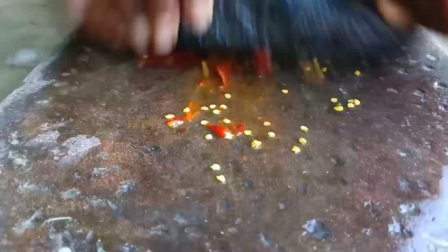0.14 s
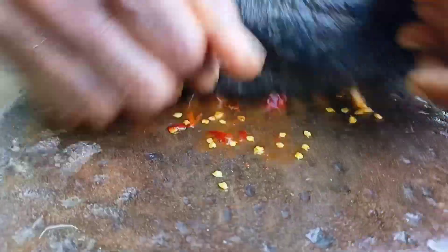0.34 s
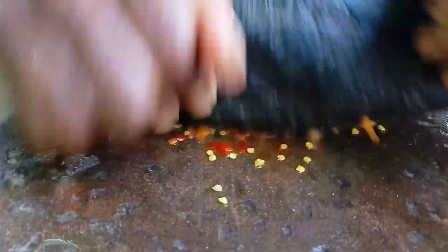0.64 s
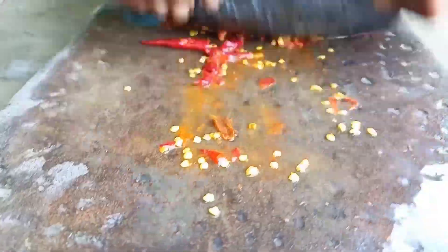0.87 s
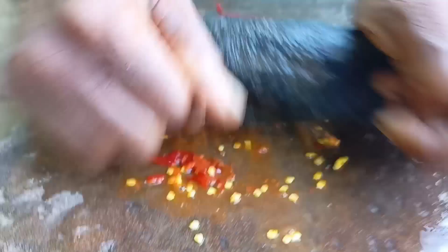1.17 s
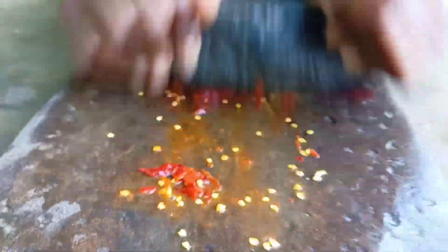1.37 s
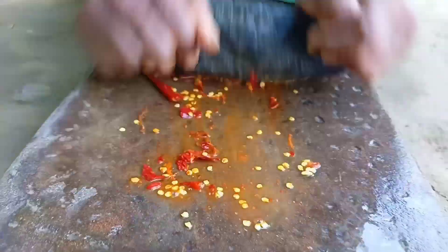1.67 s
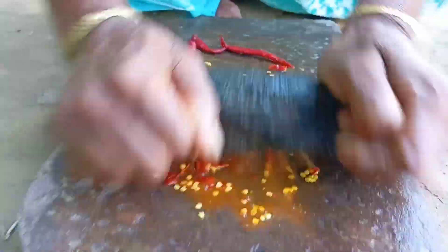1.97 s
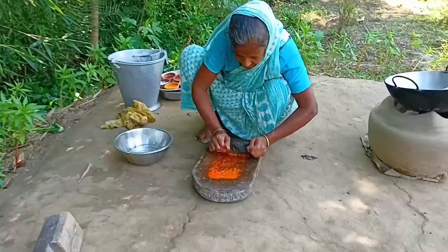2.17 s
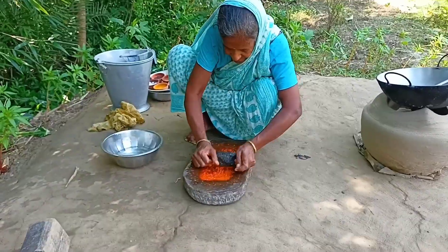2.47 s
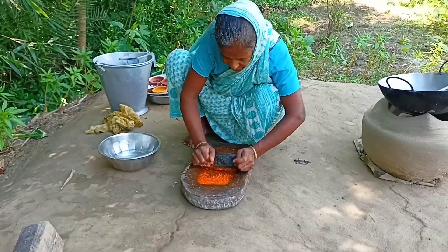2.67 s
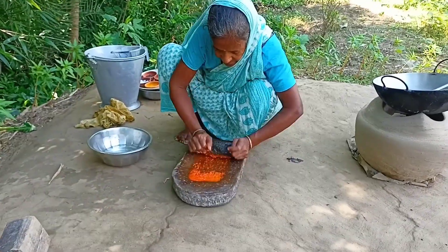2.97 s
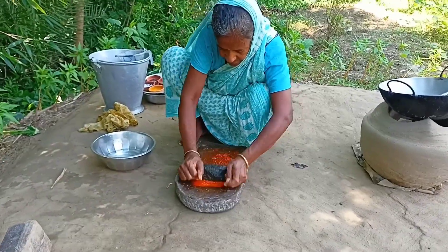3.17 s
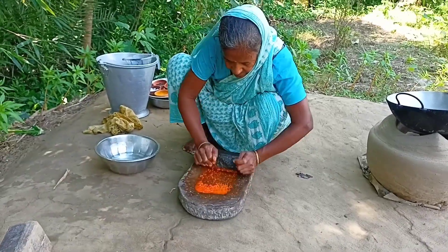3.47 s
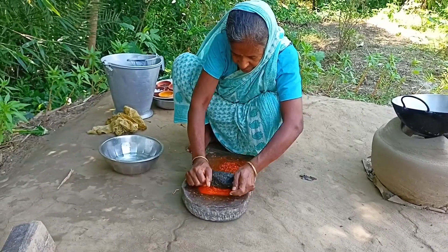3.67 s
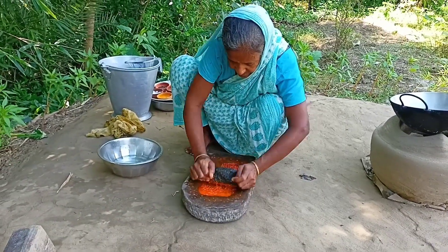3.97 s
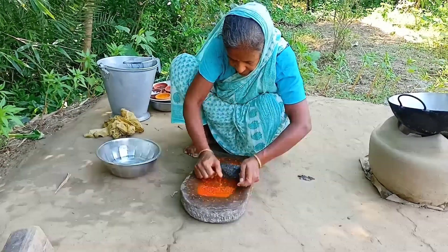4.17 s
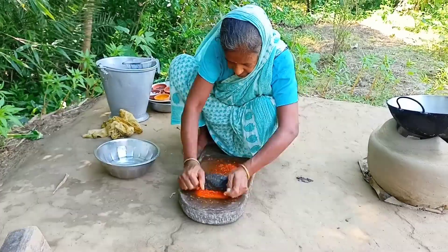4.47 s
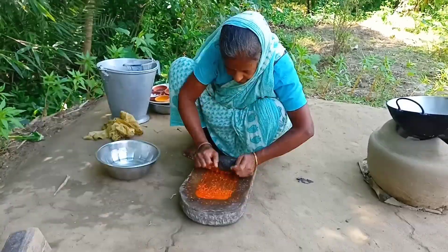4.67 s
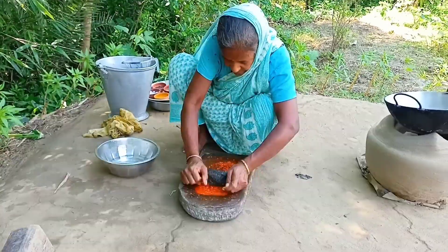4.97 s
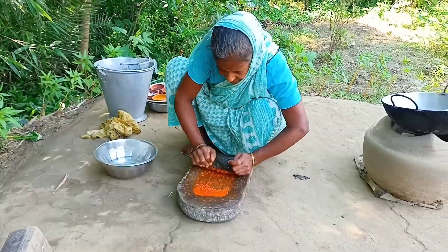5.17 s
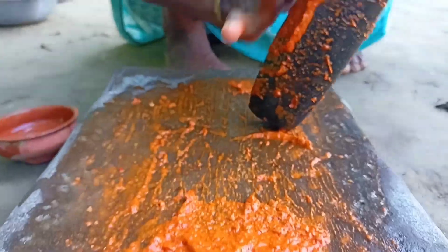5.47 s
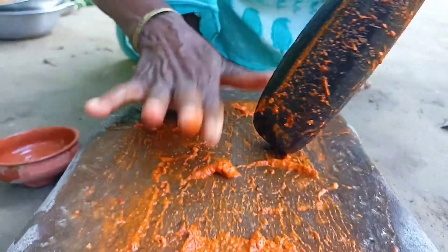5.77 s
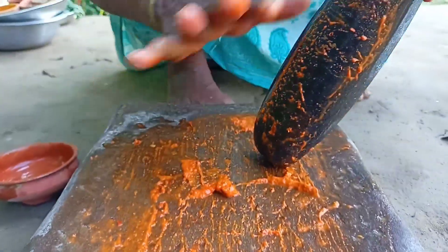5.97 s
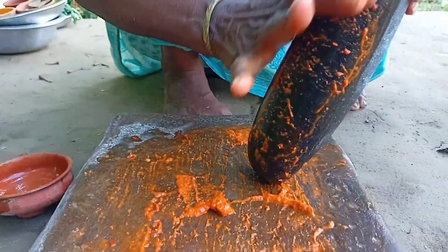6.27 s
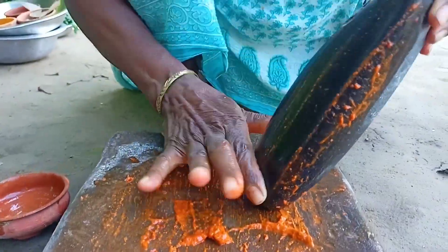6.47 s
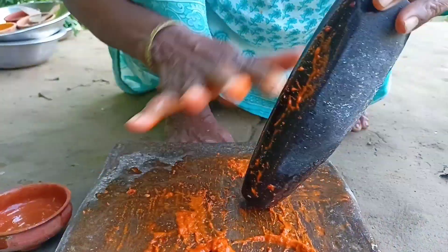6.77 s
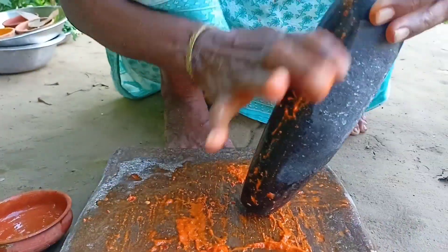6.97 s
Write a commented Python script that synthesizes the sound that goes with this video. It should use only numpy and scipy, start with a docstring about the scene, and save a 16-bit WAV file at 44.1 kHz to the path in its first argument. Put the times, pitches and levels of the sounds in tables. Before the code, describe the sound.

Dry chillies crunch and snap under a stone roller pushed to and fro near the microphone, the slab rumbling and the stones knocking with a short ring. The grinding turns quieter and more distant, a steady rhythm of sticky crackles and small pops in wet paste. It ends with a slight squeal, followed by soft finger smears and two wet clicks. Faint insects and outdoor air continue, and a far bird whistles at the end.

```python
"""Grit crunches and a slab rumbles as a stone roller is pushed to and fro over dry chillies, close by
and outdoors. The roller thumps, knocks and rings in its modes; husks fracture with snaps and squeaks.
Further off it works wet paste, which crackles and pops as its film tears, and stick-slip gives a squeal.
Last, fingers wipe the paste together with two wet clicks and a far bird whistles.
Soft garden air and insects lie beneath it all."""
import sys
import numpy as np
from scipy import signal
from scipy.fft import rfft, irfft, next_fast_len
from scipy.io import wavfile
from scipy.ndimage import uniform_filter1d, map_coordinates

SR = 44100
rng = np.random.default_rng(int(sys.argv[2]) if len(sys.argv) > 2 else 0)


def waveform_to_disk(signal):
    """Save audio, clipped to [-1, 1], as 16-bit WAV at the path in sys.argv[1]."""
    frames = np.transpose(np.atleast_2d(signal))
    scaled = np.clip(frames, -1, 1) * 32767
    samples = np.round(scaled).astype(np.int16)
    wavfile.write(sys.argv[1], SR, samples)


N = 313977
TIME = np.arange(N) / SR
FFT_SIZE = 2 * next_fast_len(N // 2 + 1)
FFT_HZ = np.fft.rfftfreq(FFT_SIZE, 1 / SR)
TOP_HZ = 15550

# spectrum of grit on stone: frequency_hz, gain_db
GRIT_SPECTRUM = [(150, -21), (420, -20), (620, -17.5), (830, -21.5), (1150, -17), (1650, -13),
                 (2700, -10.5), (3700, -12), (4900, -13), (7400, -11.5), (10100, -24), (12400, -28),
                 (15000, -19.5)]
# spectrum of a snap or pop: frequency_hz, gain_db
SNAP_SPECTRUM = [(200, -23.5), (1100, -29), (2350, -18.5), (3100, -7.5), (7400, 8), (10400, -7),
                 (12800, 8.5), (13800, -2.5), (15500, 2)]
# normal modes of the roller lying on the slab: pitch_hz, t60_s, level_db
ROLLER_MODES = [(559, 0.015, 0), (710, 0.021, -8.5), (970, 0.031, -12.5), (1309.6, 0.059, -3.5),
                (1455, 0.059, -11), (1769, 0.021, -6.5), (1900, 0.016, -2.5), (2470, 0.018, -5),
                (3210, 0.07, -12)]


def undb(db):
    """Decibels to amplitude ratio."""
    return 10 ** (np.asarray(db) / 20)


def unit(x):
    """Normalise to rms 1."""
    return x / np.sqrt(np.mean(x ** 2))


def colour(x, spectrum, tilt_db=0):
    """Minimum-phase filter through (Hz, dB) points, tilted by tilt_db per octave above 3 kHz."""
    size = 2 * next_fast_len(len(x) // 2 + 1024)
    octave = np.log2(np.maximum(np.fft.rfftfreq(size, 1 / SR), 1))
    hz, db = np.transpose(spectrum)
    gain_db = np.interp(octave, np.log2(hz), db) + tilt_db * np.maximum(octave - np.log2(3000), 0)
    cepstrum = irfft(np.log(undb(gain_db)))
    cepstrum[1:size // 2] *= 2  # folding the cepstrum makes the filter causal
    cepstrum[size // 2 + 1:] = 0
    return irfft(rfft(x, size) * np.exp(rfft(cepstrum)))[:len(x)]


def wander(rate_hz):
    """Random modulation: ramps between levels drawn rate_hz times a second; rms 1."""
    hold = max(int(SR / rate_hz), 101)
    levels = rng.standard_normal(N // 100)[:N // hold + 1]
    return unit(uniform_filter1d(np.repeat(levels, hold), hold)[:N])


def grains(per_s, spread_db):
    """Shot noise: tiny fractures at random moments, most small and a few large; rms 1."""
    size_db = spread_db * np.minimum(rng.exponential(size=N), 6)
    return unit((rng.random(N) < per_s / SR) * rng.choice([-1, 1], N) * undb(size_db))


def narrow_noise(hz, width_hz):
    """Narrow-band noise, which wavers in amplitude and phase; rms 1."""
    band = 1 / (1 + ((FFT_HZ - hz) / width_hz) ** 2)
    return unit(irfft(rfft(rng.standard_normal(FFT_SIZE)) * band)[:N])


def swell(start, end):
    """Half-sine envelope between two moments."""
    return np.sin(np.pi * np.clip((TIME - start) / (end - start), 0, 1))


def glide(start, end, start_hz, end_hz, db):
    """Linear frequency sweep that swells and fades."""
    phase = 2 * np.pi * np.cumsum(np.interp(TIME, [start, end], [start_hz, end_hz])) / SR
    return undb(db) * swell(start, end) * np.sin(phase)


def add(track, start_s, sound):
    """Superpose a short sound on the track."""
    i = int(start_s * SR)
    track[i:i + len(sound)] += sound[:N - i]


def stroke_gains(strokes, grit_power, rumble_power, contact_s, bare_rumble_db):
    """Rolling noise grows as a power of speed; on bare stone the roller rings and the rumble swells."""
    grit, rumble, ring = np.zeros((3, N))
    for start, fastest, end, grit_db, rumble_db, bare_s, ring_db in strokes:
        span = slice(max(int(start * SR), 0), int(end * SR))
        t = TIME[span]
        speed = np.sin(np.pi / 2 * np.interp(t, [start, fastest, end], [0, 1, 0]))
        contact = 1 / (1 + ((t - bare_s) / contact_s) ** 2)
        grit[span] += undb(grit_db) * speed ** grit_power
        rumble[span] += undb(rumble_db + bare_rumble_db * contact) * speed ** rumble_power
        ring[span] += undb(ring_db) * speed * contact
    return grit, rumble, ring


def crumble(per_s, surge_db, decay_s):
    """Exponential relaxation: as each seed gives way the crunch jumps and dies back. A gain of rms 1."""
    breaks = (rng.random(N) < per_s / SR) * rng.uniform(.5, 1, N)
    surges = signal.lfilter([1], [1, -np.exp(-1 / (decay_s * SR))], breaks)
    return unit(1 + undb(surge_db) * surges)


def slab_reflection(x, lag_s, echo_db):
    """Comb filtering: the slab's echo meets the direct sound, its lag shifting as the roller travels."""
    lag = lag_s * (1 + .12 * wander(6))
    return x + undb(echo_db) * map_coordinates(x, [(TIME - lag) * SR], order=3)


def fragment_flicker(x, depth_db, rate_hz, bands=28):
    """Each fragment has its own resonance, so neighbouring bands flare up independently."""
    place = np.interp(np.sqrt(FFT_HZ), np.sqrt([500, TOP_HZ]), [0, bands - 1])
    spectrum = rfft(x, FFT_SIZE)
    out = np.zeros(N)
    for k in range(bands):
        band = irfft(spectrum * np.maximum(1 - np.abs(place - k), 0))[:N]
        out += band * undb(depth_db * wander(rate_hz))
    return out


def stone_ring(modes, favoured_hz, octaves):
    """Impulse response of damped modes, weighted by the place and hardness of the contact; peak 1."""
    t = TIME[:SR // 8]
    ring = np.zeros(len(t))
    for hz, t60, db in modes:
        weight = undb(db) / (1 + (np.log2(hz / favoured_hz) / octaves) ** 2)
        ring += weight * np.sin(2 * np.pi * hz * t) * np.exp(-np.log(1000) * t / t60)
    return ring / np.abs(ring).max()


def rubbed(ring):
    """Forced vibration: countless tiny slips keep a resonance sounding; rms 1."""
    slips = np.diff(grains(per_s=4000, spread_db=1), prepend=0)
    return unit(signal.fftconvolve(slips, ring)[:N])


def roller_tone():
    """Selective excitation: sliding contact sounds mainly one mode of the roller; rms 1."""
    return rubbed(stone_ring(ROLLER_MODES, 1200, octaves=0.022))


def dry_grinding():
    """Brittle fracture: grit is crushed under the roller, which judders over the pitted slab and rings."""
    # pushes and pulls: start_s, fastest_s, end_s, grit_db, rumble_db, bare_stone_s, ring_db
    strokes = [(-0.01, 0.117, 0.21, -37.5, -40.5, 0.13, -42.5),
               (0.202, 0.307, 0.41, -31.5, -46, 0.299, -44.5),
               (0.436, 0.542, 0.68, -36.5, -49.5, 0.536, -43),
               (0.641, 0.698, 0.82, -30, -46.5, 0.773, -38.5), (0.9, 0.955, 1.02, -37.5, -39, 0.941, -29.5),
               (1.02, 1.05, 1.095, -39, -47, 1.052, -46), (1.06, 1.135, 1.253, -28.5, -41, 1.125, -42),
               (1.24, 1.383, 1.49, -34, -40, 1.37, -38.5),
               (1.452, 1.546, 1.671, -28.0, -42.5, 1.559, -37.5),
               (1.68, 1.795, 1.914, -35, -41, 1.777, -36.5), (1.88, 1.944, 2.1, -29.5, -42.5, 1.971, -36.5),
               (2.08, 2.215, 2.324, -36, -45, 2.207, -44.5), (2.285, 2.35, 2.416, -36.5, -47.5, 2.345, -49)]
    # the slab's rumble: frequency_hz, gain_db
    slab_spectrum = [(25, -43), (42, -23), (87, -3.5), (185, 1), (235, -2), (320, -14), (520, -23),
                     (1200, -63.5)]
    # bright overtones of the stones, rung by the fractures: pitch_hz, t60_s, level_db
    bright_modes = [(2700, 0.0094, -2), (3680, 0.017, -3), (4432, .025, -3), (4830, 0.031, 1.5),
                    (5460, .025, -2.5), (6300, 0.01, -2.5), (7170, 0.027, 1.5)]
    grit, rumble, ring = stroke_gains(strokes, grit_power=2.5, rumble_power=1.4,
                                      contact_s=0.022, bare_rumble_db=2.5)
    judder = undb(0.96 * wander(160) + 0.57 * wander(40))
    seeds = crumble(per_s=100, surge_db=-7.5, decay_s=.003)
    fractures = slab_reflection(grains(per_s=15000, spread_db=2.5), lag_s=.0009, echo_db=-9)
    crunch = colour(fractures * judder * seeds, GRIT_SPECTRUM)
    crunch = unit(fragment_flicker(crunch, depth_db=4.5, rate_hz=70))
    bumps = unit(colour(grains(per_s=1500, spread_db=5) * judder, slab_spectrum))
    body = undb(-8.5) * rubbed(stone_ring(ROLLER_MODES, 680, octaves=0.36))
    overtones = undb(-10) * rubbed(stone_ring(bright_modes, 4800, octaves=2.2)) * judder
    tone = undb(-1.2) * roller_tone()
    return grit * (crunch + overtones) + undb(-0.36) * rumble * bumps + ring * (tone + body)


def cricket():
    """Stridulation: evenly spaced chirps, each a few beats of the wings; rms 1."""
    chirps_per_s, chirp_peak_s, wingbeats_per_s = 9.08, 5.71, 37
    chirps = np.cos(2 * np.pi * chirps_per_s * (TIME - chirp_peak_s))
    beats = np.cos(2 * np.pi * wingbeats_per_s * TIME)
    return unit(narrow_noise(8685, width_hz=60) * undb(6 * np.tanh(2 * chirps + 1) + 3 * beats))


def garden():
    """Ambient noise: soft outdoor air, and a cricket that follows its level up to a ceiling."""
    # loudness of the air: time_s, level_db
    air_levels = [(0, -51.5), (2.3, -53.5), (2.5, -72), (5.45, -68), (5.51, -81.5), (5.59, -75.5),
                  (5.62, -67.5), (7.12, -62.5)]
    # colour of the air: frequency_hz, gain_db
    air_spectrum = [(25, -23), (70, -1.5), (185, -1), (300, -7), (550, -10.5), (1000, -20), (3500, -17.5),
                    (5000, -18.5), (7000, -17.5), (8300, -15.5), (10000, -29), (15000, -22)]
    air_db = np.interp(TIME, *np.transpose(air_levels))
    air = unit(colour(rng.standard_normal(N), air_spectrum))
    cricket_db = np.minimum(air_db, -73) + 1.5
    return undb(air_db) * air + undb(cricket_db) * cricket()


def thumps():
    """Damped oscillation: under the roller's weight the slab bounces once or twice on the earth."""
    # bounces of the slab: start_s, level_db, pitch_hz
    bounces = [(0.088, -24.5, 136), (0.303, -32, 162), (0.733, -25.5, 143), (0.755, -26.5, 118),
               (0.954, -31, 229), (1.037, -26, 103), (1.13, -28.5, 177), (1.175, -28.5, 179),
               (1.303, -32, 198), (1.339, -28, 177), (1.455, -25.5, 143), (1.544, -36.5, 178),
               (1.758, -26, 173), (1.862, -29, 110), (1.985, -24.5, 152.8), (5.956, -53.5, 105.4),
               (6.772, -52, 131)]
    out = np.zeros(N)
    t = TIME[:SR // 8]
    rise_s = .005
    envelope = t / rise_s * np.exp(1 - t / rise_s)
    for start, db, hz in bounces:
        add(out, start, undb(db - 1.5) * np.sin(2 * np.pi * hz * t) * envelope)
    return out


def knocks():
    """Impact excitation: the roller tips onto the slab; crushed husk draws the contact into a rattle."""
    # knocks and light taps: start_s, level_db, favoured_hz
    impacts = [(0.1615, -18, 543), (0.169, -25.5, 1010), (.499, -28.5, 815), (0.795, -34.5, 735),
               (0.9128, -29, 590), (0.925, -23.5, 540), (1.1019, -3, 1990), (1.12, -29, 1410),
               (1.9127, -2.5, 1720), (2.649, -25, 1246), (3.286, -37.5, 1090), (3.4821, -35, 1054),
               (3.887, -44, 990), (4.313, -40.5, 940), (4.366, -41.5, 745), (4.944, -52, 790),
               (5.612, -51, 308), (5.87, -59.5, 481), (6.266, -58.5, 700)]
    out = np.zeros(N)
    t = TIME[:SR // 8]
    slab_note = undb(-26) * stone_ring(ROLLER_MODES, 717, octaves=0.021)  # wherever the roller lands
    attack = 1 - np.exp(-t / 0.0014)
    for start, db, hz in impacts:
        ring = (stone_ring(ROLLER_MODES, hz, octaves=0.32) + slab_note) * attack
        crush = rng.standard_normal(len(t)) * np.exp(-t / 0.0051)
        rattle = signal.fftconvolve(crush, ring * np.exp(-t / 0.006))[:len(t)]
        rattle_db = min(db, -24) - 4  # a husk bears only so much force, so hard knocks stay clean
        add(out, start, undb(db) * ring / np.abs(ring).max())
        add(out, start, undb(rattle_db) * rattle / np.abs(rattle).max())
    return out


def husk_snaps():
    """Crack propagation: each break is a run of micro-cracks, then a faint scatter from the ground."""
    # breaking husks and seeds: start_s, level_db, decay_s, tilt_db_per_octave
    breaks = [(0.21, -8, 0.0034, 7.5), (0.2142, -13, 0.0031, 5.5), (0.5405, -27, 0.0038, -11),
              (.681, -22.5, 0.0033, -15), (0.7018, -16, 0.00041, -9), (1.029, -37, 0.0063, -10.5),
              (1.048, -31, 0.0034, -5), (1.148, -31, 0.001, -23), (1.341, -32.5, 0.0099, -11),
              (1.5624, -28, 0.0025, -15), (2.2893, -34, 0.0044, 5), (4.944, -34, 0.0078, -7.5)]
    out = np.zeros(N)
    t = TIME[:SR // 8]
    scatter = undb(-34.5) * np.exp(-t / 0.022)
    for start, db, decay_s, tilt_db in breaks:
        cracking = np.exp(-t / decay_s) * (1 - np.exp(-t / (0.18 * decay_s)))
        burst = colour(rng.choice([-1, 1], len(t)) * (cracking + scatter), SNAP_SPECTRUM, tilt_db)
        add(out, start, undb(db) * burst * np.sqrt(decay_s * SR / np.sum(burst ** 2)))
    return out


def husk_squeaks():
    """Stick-slip friction: a trapped husk slips ever faster, giving rough, rising chirps."""
    # squeaks under the roller: start_s, end_s, start_hz, end_hz, level_db
    squeaks = [(0.921, 0.942, 3000, 3870, -38.5), (0.952, .968, 4700, 5060, -29.5)]
    return narrow_noise(0, width_hz=180) * sum(glide(*squeak) for squeak in squeaks)


def wet_grinding():
    """Viscous cushioning by the paste: fine sticky crackle above a softer rumble and a hollow tone."""
    # pushes and pulls: start_s, fastest_s, end_s, grit_db, rumble_db, bare_stone_s, ring_db
    strokes = [(2.37, 2.46, 2.564, -45, -53, 2.462, -44.5), (2.56, 2.685, 2.77, -49.5, -51.5, 2.643, -43.5),
               (2.738, 2.836, 2.962, -41.5, -48.5, 2.856, -44),
               (2.965, 3.103, 3.205, -50, -54.0, 3.058, -53), (3.159, 3.26, 3.37, -43, -50.5, 3.268, -48.5),
               (3.393, 3.505, 3.605, -48, -49, 3.488, -51),
               (3.573, 3.687, 3.774, -43.5, -49.5, 3.711, -50.5),
               (3.809, 3.922, 4.035, -49.5, -52.5, 3.912, -54),
               (3.995, 4.107, 4.205, -43.5, -50, 4.12, -50), (4.225, 4.346, 4.46, -48.0, -49, 4.33, -45.5),
               (4.4, 4.527, 4.677, -44.5, -53.5, 4.574, -49.5), (4.67, 4.8, 4.864, -44.5, -51, 4.74, -59.5),
               (4.857, 4.955, 5.07, -41, -49.5, 4.965, -46.5),
               (5.125, 5.22, 5.36, -47, -53.5, 5.195, -58.5),
               (5.28, 5.386, 5.497, -43.5, -51.5, 5.446, -53.5)]
    # the paste's crackle: frequency_hz, gain_db
    crackle_spectrum = [(200, -25.5), (550, -35.5), (1000, -23.5), (1750, -26), (2550, -30.5),
                        (3400, -17.5), (6500, -16), (7500, -5.5), (8500, -7), (9700, -13), (13500, -19),
                        (15000, -20)]
    # the wet slab's rumble: frequency_hz, gain_db
    slab_spectrum = [(25, -29), (42, -19), (87, -5.5), (185, 4.5), (235, 1), (320, -9), (520, -15.5),
                     (1200, -56)]
    # modes of the slab under its film of paste: pitch_hz, t60_s, level_db
    slab_modes = [(728, 0.078, -1), (789, 0.09, -3.5), (1074, 0.016, -1.5), (1730, 0.028, -11),
                  (3320, 0.013, -3), (5640, 0.017, -16), (7100, 0.05, -5)]
    grit, rumble, ring = stroke_gains(strokes, grit_power=2.29, rumble_power=1.39,
                                      contact_s=0.026, bare_rumble_db=5)
    judder = undb(2.04 * wander(140) + 1.36 * wander(40))
    seeds = crumble(per_s=96, surge_db=-1, decay_s=0.0012)
    film = grains(per_s=12000, spread_db=3.5) + undb(-8.5) * grains(per_s=780, spread_db=3)
    film = slab_reflection(film, lag_s=0.001, echo_db=-12)
    crackle = colour(film * judder * seeds, crackle_spectrum)
    crackle = unit(fragment_flicker(crackle, depth_db=2.5, rate_hz=80))
    bumps = unit(colour(grains(per_s=2700, spread_db=2) * judder, slab_spectrum))
    slab_drive = undb(-14.5) * rumble + undb(-17) * ring  # rolling weight and bare stone contact
    hollow = rubbed(stone_ring(slab_modes, 530, octaves=1.7)) * slab_drive
    body = undb(-17.5) * rubbed(stone_ring(ROLLER_MODES, 790, octaves=0.53))
    tone = undb(-1.6) * roller_tone()
    return grit * crackle + undb(-2.1) * rumble * bumps + ring * (tone + body) + hollow


def film_tear(spectrum, tear_s, lowest_hz):
    """Rupture of a paste film radiates a pulse; the stones scatter a short tail after it. Peak 1."""
    t = TIME[:SR // 16]
    envelope = np.exp(-t / tear_s) + undb(-21) * np.exp(-t / .0019)
    burst = colour(rng.choice([-1, 1], len(t)) * envelope, spectrum)
    sound = signal.sosfilt(signal.butter(4, lowest_hz, "high", fs=SR, output="sos"), burst)
    return sound / np.abs(sound).max()


def paste_pops():
    """Compression under the roller bursts air pockets in the paste."""
    # bursting pockets: start_s, peak_db
    pockets = [(2.391, -33), (2.7298, -38), (2.7818, -33), (2.8074, -27), (3.243, -27.5), (3.2868, -23.5),
               (3.4643, -36), (3.502, -24), (3.7256, -28), (4.0503, -16), (4.368, -33), (4.4648, -34),
               (4.733, -34), (4.792, -29), (4.914, -25), (5.0248, -27), (5.277, -33)]
    out = np.zeros(N)
    for start, db in pockets:
        add(out, start, undb(db) * film_tear(SNAP_SPECTRUM, tear_s=.0008, lowest_hz=1500))
    return out


def insect_buzz():
    """A second insect buzzes: narrow-band noise under a fluttering amplitude modulation."""
    # spells of buzzing: start_s, end_s, pitch_hz, level_db
    spells = [(2.6, 4.993, 7210, -75), (6.099, 6.264, 6470, -67), (6.51, 6.64, 6500, -67.5),
              (6.891, 7.143, 6650, -64)]
    buzz = sum(undb(db) * np.sqrt(swell(start, end)) * narrow_noise(hz, width_hz=280)
               for start, end, hz, db in spells)
    return buzz * undb(2.7 * wander(60))


def roller_squeal():
    """Periodic stick-slip on the last strokes gives a thin, unsteady tone with weak harmonics."""
    # course of the squeal: time_s, pitch_hz, level_db
    contour = [(5.15, 800, -85), (5.251, 772, -69), (5.35, 770, -72), (5.39, 782, -49), (5.44, 790, -59),
               (5.509, 718, -86)]
    times, hz, db = np.transpose(contour)
    pitch_hz = np.interp(TIME, times, hz) * (1 + .012 * wander(150))
    phase = 2 * np.pi * np.cumsum(pitch_hz) / SR
    tone = np.sin(phase) + undb(-33.5) * np.sin(2 * phase) + undb(-17) * np.sin(3 * phase)
    gain = undb(np.interp(TIME, times, db, left=-140, right=-140))
    return unit(tone) * gain * undb(4.3 * wander(60))


def finger_wipes():
    """Friction noise: fingertips smear the paste over the stone."""
    # sweeps of the fingers: start_s, end_s, level_db
    wipes = [(5.586, 5.846, -61.5), (6.34, 6.65, -66), (6.76, 6.858, -59)]
    smear = unit(colour(grains(per_s=4400, spread_db=0), GRIT_SPECTRUM, tilt_db=2.5))
    return smear * sum(undb(db) * swell(start, end) for start, end, db in wipes)


def finger_clicks():
    """Adhesion fails abruptly as sticky fingers part from the paste, giving sharp clicks."""
    # partings: start_s, peak_db, lowest_hz
    partings = [(5.9447, -12, 2800), (6.7769, -20.5, 1100)]
    # colour of a click: frequency_hz, gain_db
    click_spectrum = [(600, -14), (1500, -3), (3600, 5), (5300, -1), (7200, 2), (10300, -12), (12500, -1),
                      (15000, 0)]
    out = np.zeros(N)
    for start, db, lowest_hz in partings:
        add(out, start, undb(db) * film_tear(click_spectrum, tear_s=.00001, lowest_hz=lowest_hz))
    return out


def far_bird():
    """Scattering by foliage blurs a far bird's falling whistles."""
    # notes of the call: start_s, end_s, start_hz, end_hz, level_db
    whistles = [(6.876, 6.948, 1960, 1575, -66.5), (6.904, 7.001, 3940, 3080, -66.5),
                (7.013, 7.102, 3900, 3220, -76)]
    return narrow_noise(0, width_hz=230) * sum(glide(*whistle) for whistle in whistles)


def scene():
    """Superposition of all sources at one point, alike in both channels."""
    mono = dry_grinding() + garden() + thumps() + knocks() + husk_snaps() + husk_squeaks()
    mono += wet_grinding() + paste_pops() + insect_buzz() + roller_squeal()
    mono += finger_wipes() + finger_clicks() + far_bird()
    return np.array([mono, mono])


def record(dry):
    """Band limiting: the microphone sheds the deepest bass and a steep low-pass cuts the top."""
    thinned = signal.sosfilt(signal.butter(3, 48, "high", fs=SR, output="sos"), dry)
    return signal.sosfilt(signal.ellip(10, .2, 70, TOP_HZ, fs=SR, output="sos"), thinned)


dry = scene()
out = record(dry)
waveform_to_disk(out)
```